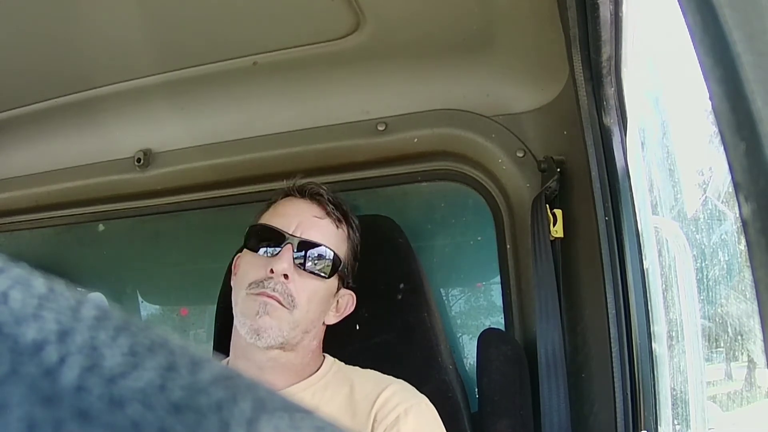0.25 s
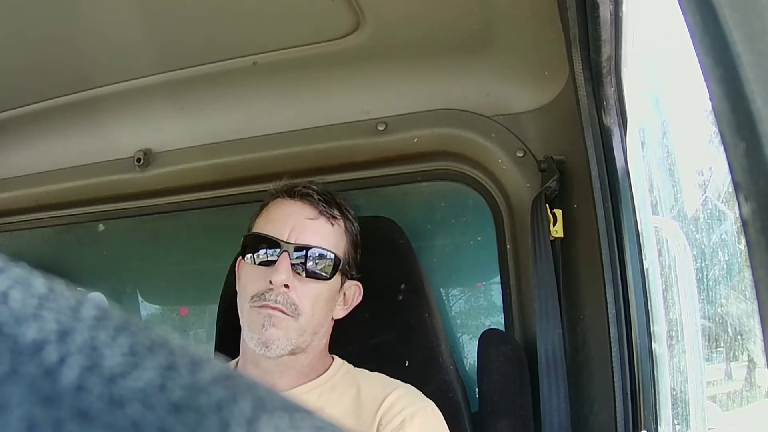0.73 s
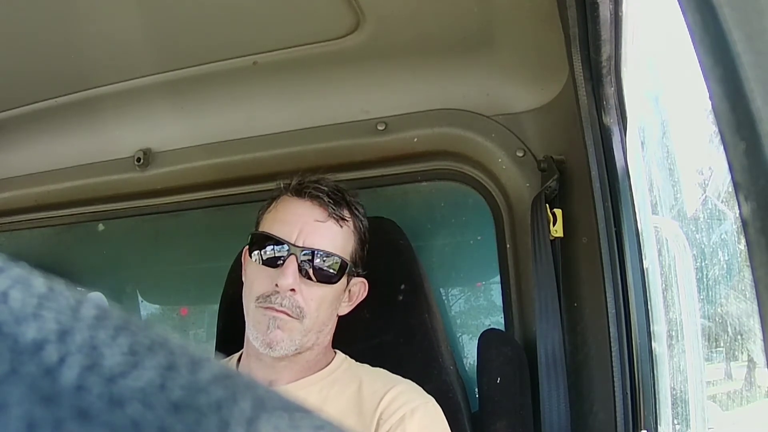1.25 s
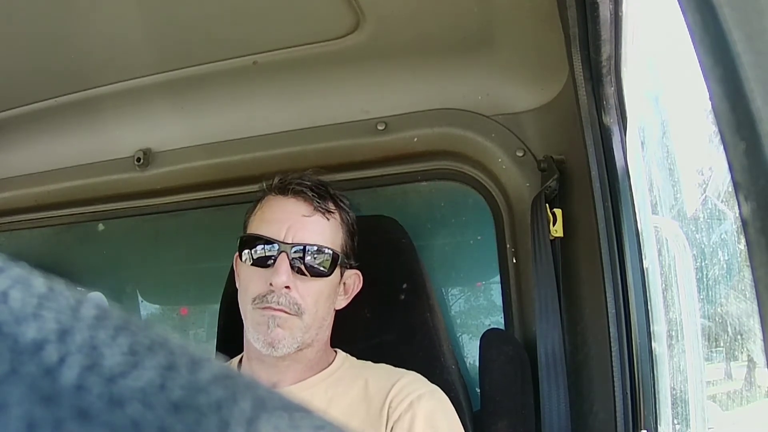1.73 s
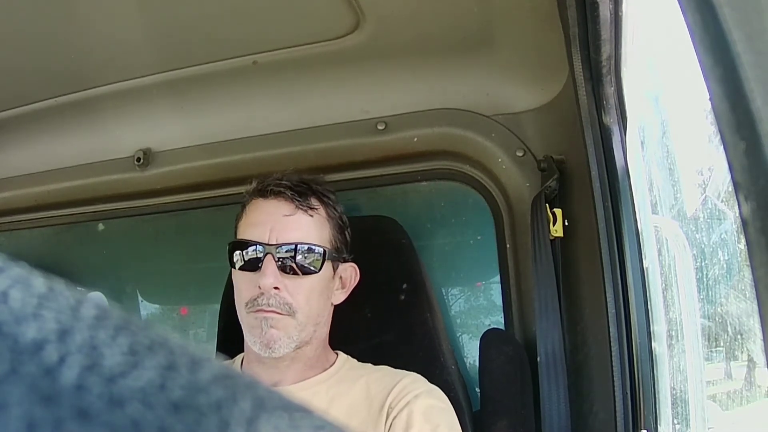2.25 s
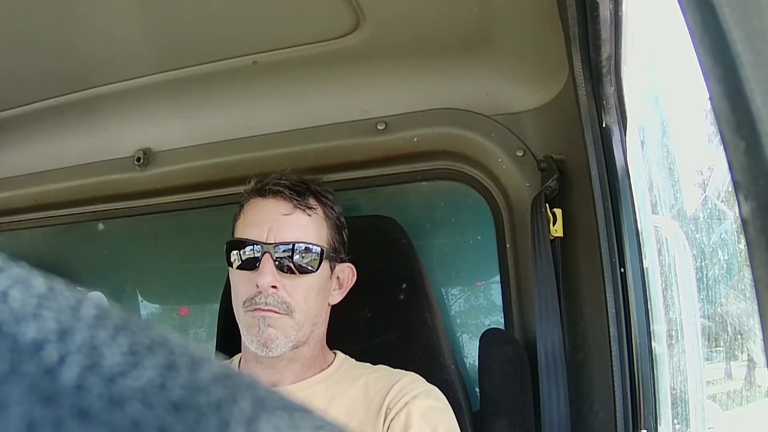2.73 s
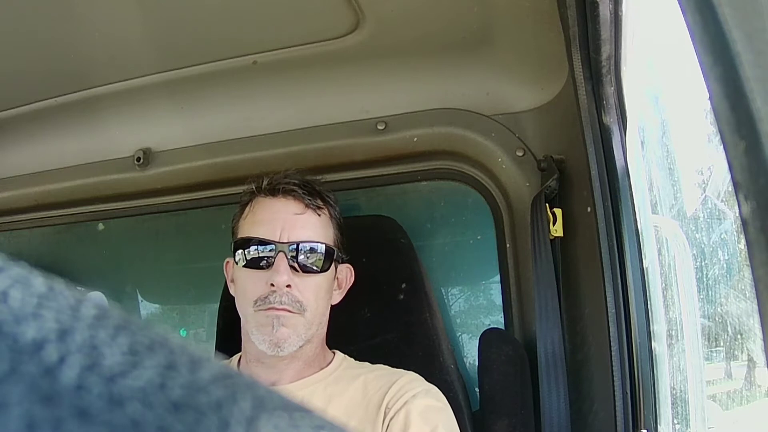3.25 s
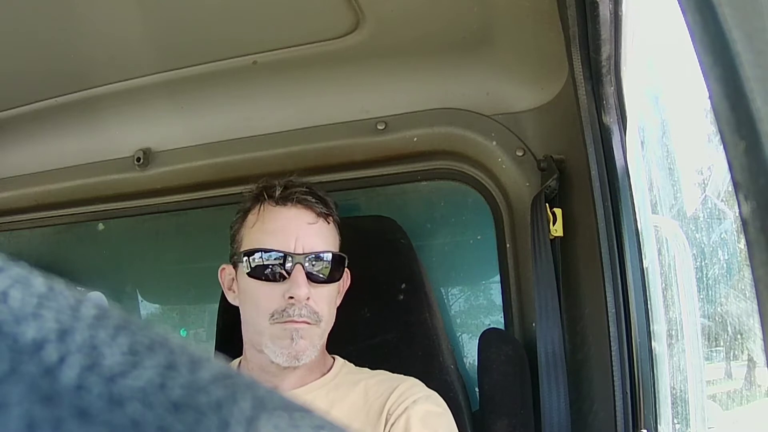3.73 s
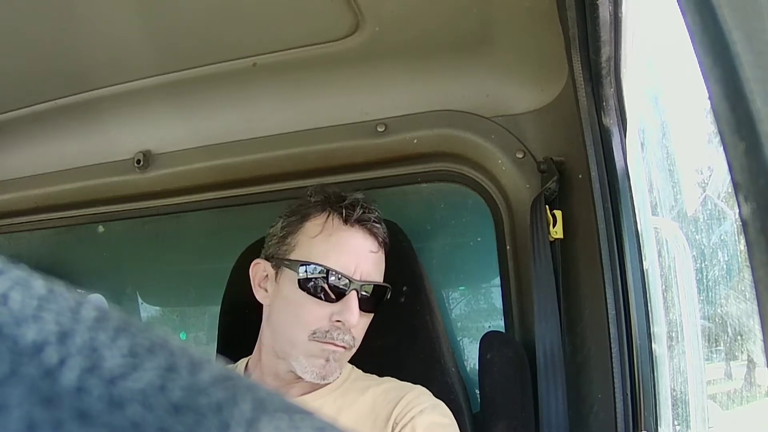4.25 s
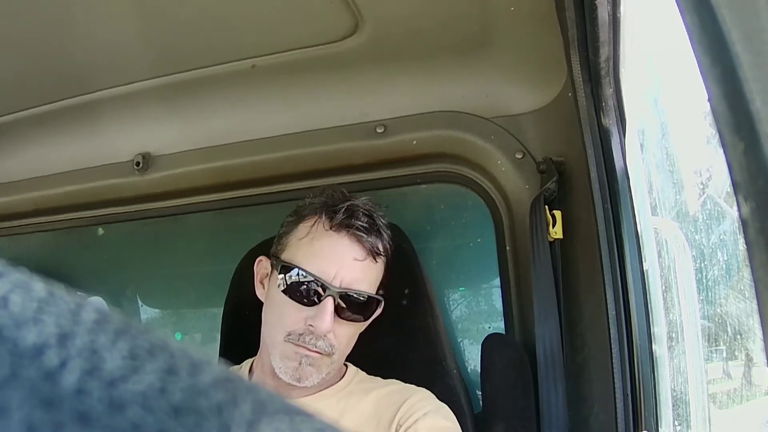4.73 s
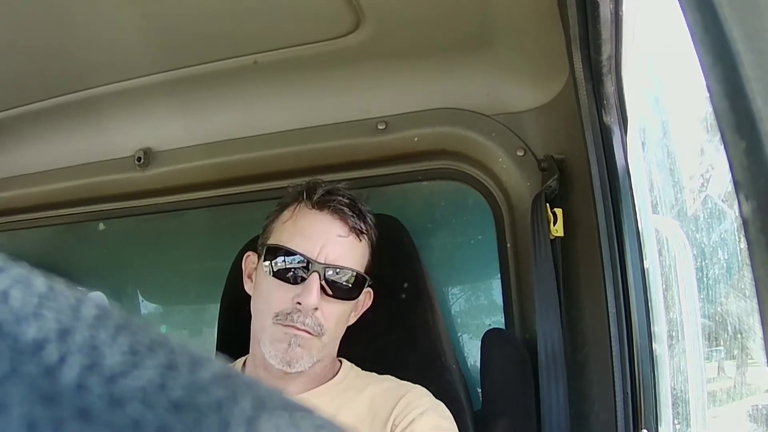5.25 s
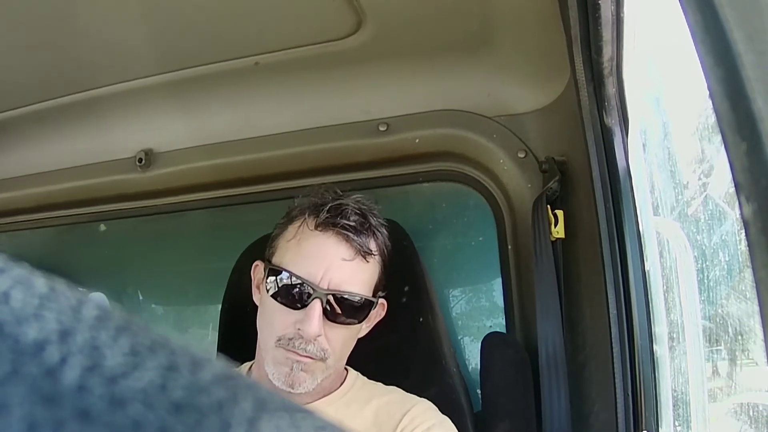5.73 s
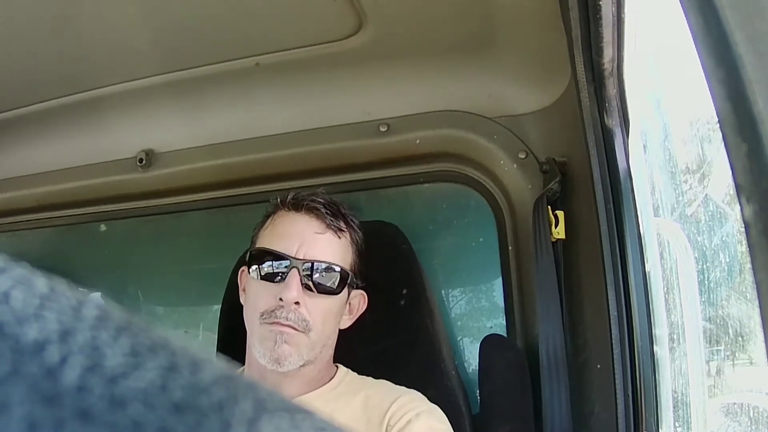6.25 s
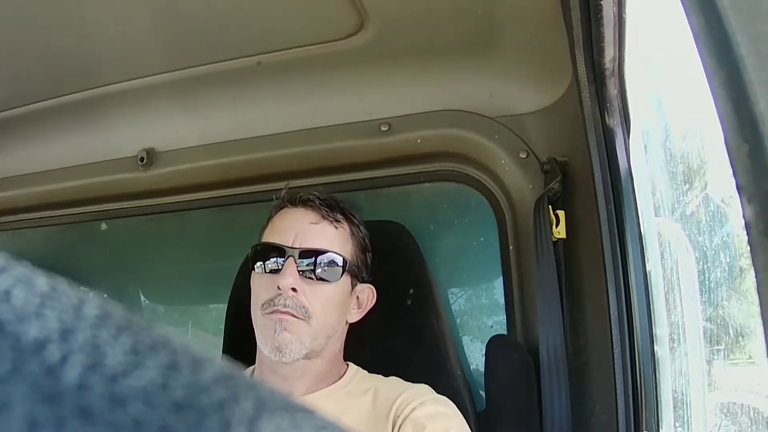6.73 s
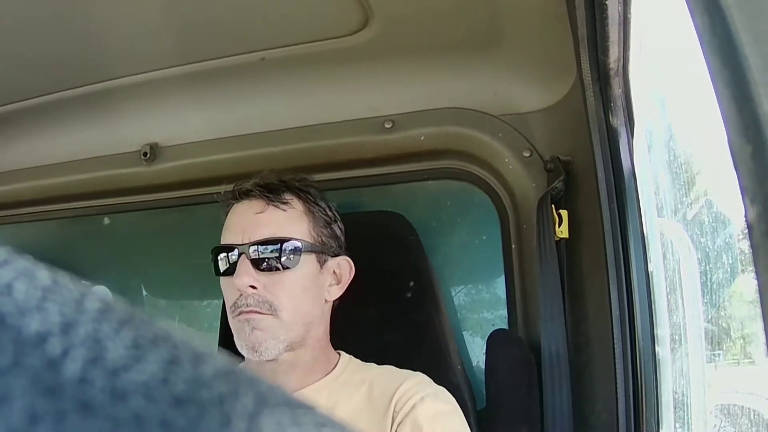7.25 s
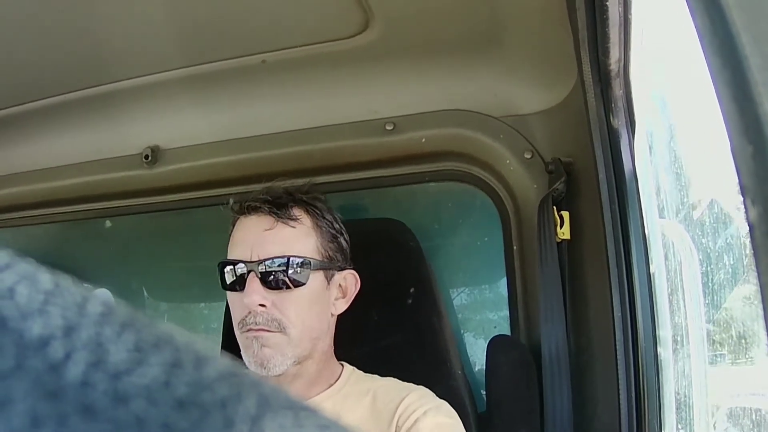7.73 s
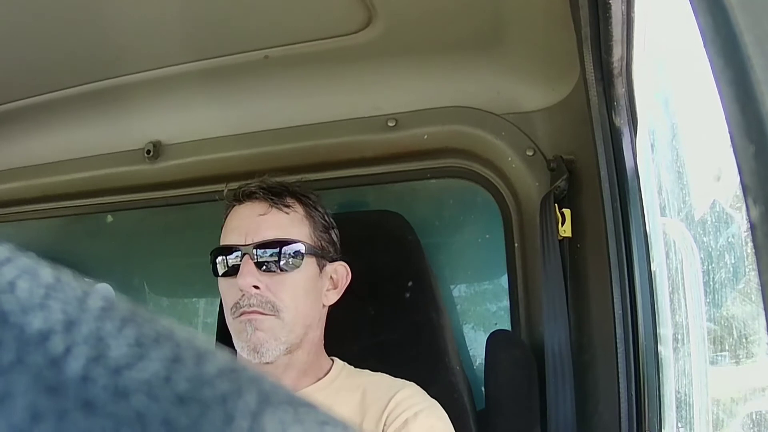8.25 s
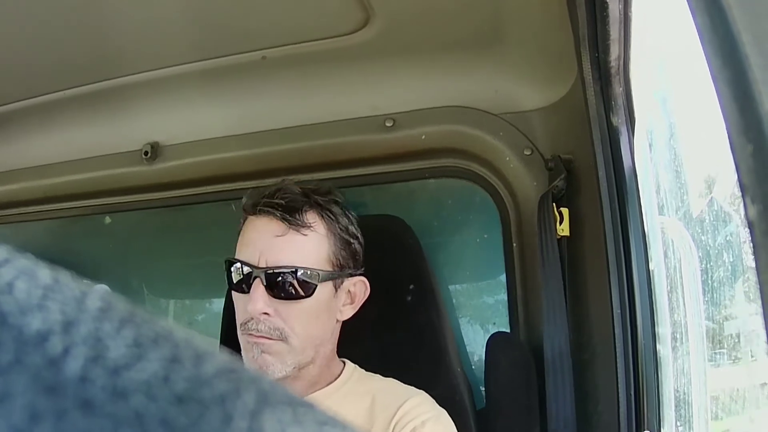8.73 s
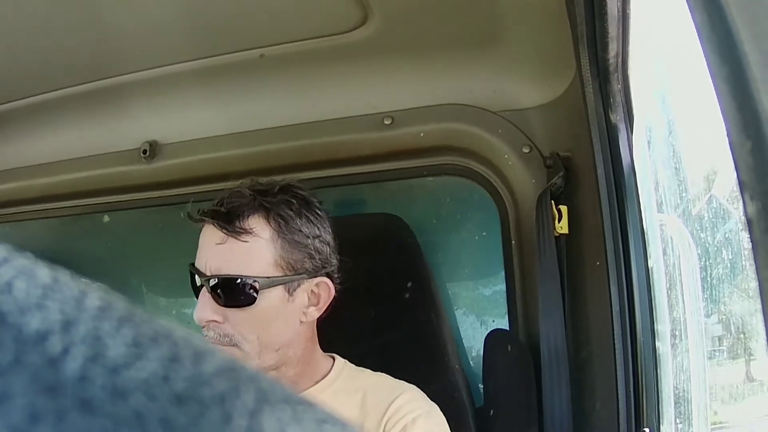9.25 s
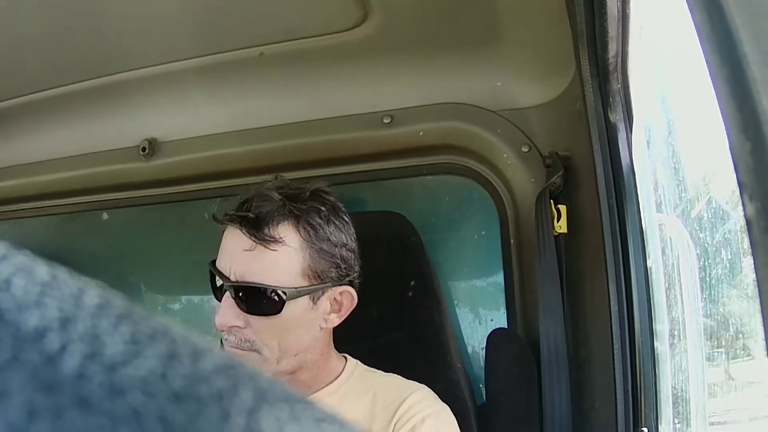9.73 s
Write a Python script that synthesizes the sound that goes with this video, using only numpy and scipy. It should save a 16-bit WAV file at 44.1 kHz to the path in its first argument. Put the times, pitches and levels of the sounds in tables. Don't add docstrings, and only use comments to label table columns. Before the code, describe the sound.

Inside a closed truck cab, one microphone hears a six-cylinder diesel idling steadily from 0 to 3.8 seconds: low, slightly uneven throb, soft clatter and faint gear hum. Around 3.9 a dull jolt marks the clutch biting; revs sag to a slow, heavy lugging by 5, with cab shudder, a cluster of padded linkage knocks, high trim ticks and tiny air puffs. From 5.4 revs climb, growing loud and boomy with buzzing panels, peaking near 6.9 amid low thuds, a thin gear whine, a slight belt squeak and very faint turbo whistle. Revs fall with a small dull spit at 7.1, rise again around 8, then drop. At 8.5 the gear lever hits its stop with a hard, rattling clunk; at 8.9 a short bright air blast vents. The engine pulls harder again, and a second clunk lands at 9.86 before a last low jolt.

```python
import sys
import numpy as np
from scipy import signal
from scipy.fft import rfft, irfft
from scipy.io import wavfile
from scipy.ndimage import uniform_filter1d

SR = 44100
rng = np.random.default_rng(int(sys.argv[2]) if len(sys.argv) > 2 else 0)


def pcm_store(signal):
    levels = np.round(np.clip(np.atleast_2d(signal), -1, 1) * 32767)
    wavfile.write(sys.argv[1], SR, levels.astype(np.int16).T)


def attenuation_scalar(level_db):
    decades = np.asarray(level_db, float) / 20
    return 10 ** decades


N = 440118

IDLE_ENDS_S, CLUTCH_BITES_S, CLUTCH_S = 3.82, 3.75, 0.21


def rms_one(x):
    return x / np.sqrt(np.mean(x ** 2) + 1e-20)


def evened(x):
    return x / np.sqrt(uniform_filter1d(x ** 2, SR // 2) + 1e-20)


def in_time(rows):
    s, *columns = np.transpose(rows)
    return [np.interp(np.arange(N) / SR, s, c) for c in columns]


def lowpass(x, order, hz):
    return signal.sosfilt(signal.butter(order, hz, fs=SR, output="sos"), x)


def band(x, low_hz, high_hz):
    return signal.sosfilt(signal.butter(3, [low_hz, high_hz], "band", fs=SR, output="sos"), x)


def drift(per_s):
    steps = rng.standard_normal(int(40 * N / SR) + 2)
    slow = signal.lfilter([1], [1, -np.exp(-2 * np.pi * per_s / 40)], steps)
    return np.interp(np.arange(N) / SR * 40, np.arange(len(slow)), rms_one(slow))


def bump(s, length):
    return np.cos(np.pi * np.clip((np.arange(N) / SR - s) / length, -.5, .5)) ** 2


def colour(x, slope, peaks):
    hz = np.maximum(np.fft.rfftfreq(16384, 1 / SR), 1)
    slope_hz, slope_db = np.transpose(slope)
    db = np.interp(np.log(hz), np.log(slope_hz), slope_db)
    db = db + sum(top_db / (1 + (2 * (hz - centre) / width) ** 2) for centre, width, top_db in peaks)
    cepstrum = irfft(np.log(attenuation_scalar(db)))
    cepstrum[1:8192] *= 2
    cepstrum[8193:] = 0
    return signal.fftconvolve(x, irfft(np.exp(rfft(cepstrum))))[:N]


def ring(clicks, hz, t60):
    r, w = attenuation_scalar(-60 / (t60 * SR)), 2 * np.pi * hz / SR
    return signal.lfilter([0, np.sin(w)], [1, -2 * r * np.cos(w), r * r], clicks + 1e-18)


def strike(times, levels_db, modes, spread_db):
    at, out = np.round(np.array(times) * SR).astype(int), np.zeros(N)
    levels_db = levels_db + spread_db * rng.standard_normal((len(at), len(modes)))
    for k, (hz, mode_db, t60) in enumerate(modes):
        clicks = np.zeros(N)
        clicks[at] = attenuation_scalar(levels_db[:, k] + mode_db) * (-1) ** k
        out += ring(clicks, hz, t60)
    return out


def dulled(hits, modes, offset_db):
    s, peak_db, dull_hz = np.transpose(hits)
    softness_db = -10 * np.log10(1 + (np.array(modes)[:, 0] / dull_hz[:, None]) ** 4)
    return strike(s, peak_db[:, None] + offset_db + softness_db, modes, spread_db=1.5)


def whistle(rows, width_hz, even=0):
    s, hz, level_db = np.transpose(rows)
    t = np.arange(int(s[0] * SR), min(int(s[-1] * SR), N)) / SR
    fade = np.clip(np.minimum(t - s[0], s[-1] - t) / 0.022, 0, 1)
    r = np.exp(-np.pi * width_hz / SR)
    flutter = signal.lfilter([1], [1, -2 * r, r * r], rng.standard_normal((2, len(t) + 3000)))[:, 3000:]
    phase = 2 * np.pi * np.cumsum(np.interp(t, s, hz)) / SR
    tone = flutter[0] * np.sin(phase) + flutter[1] * np.cos(phase)
    tone = rms_one(tone / np.hypot(*flutter) ** even)
    out, at = np.zeros(N), int(s[0] * SR)
    out[at:at + len(t)] = fade * attenuation_scalar(np.interp(t, s, level_db)) * tone
    return out


def glide(s, length, from_hz, to_hz, db, swell_db):
    u = np.linspace(0, 1, 9)
    return np.transpose([s + length * u, from_hz + (to_hz - from_hz) * u, db - swell_db * (2 * u - 1) ** 2])


def glides(rows, swell_db, width_hz, even=0):
    return sum(whistle(glide(*row, swell_db), width_hz, even) for row in rows)


def jets(rows, slope, peaks, short_t60, long_t60):
    rise_share, tail_open_s = .22, .012
    out, white = np.zeros(N), rng.standard_normal(N)
    t = np.arange(int(.4 * SR)) / SR
    for s, level_db, opening, slope_db in rows:
        rise = rise_share * opening
        t60 = long_t60 - (long_t60 - short_t60) * np.exp(-opening / tail_open_s)
        at = round(s * SR)
        jet = colour(white[at - 4000:at + len(t)], slope + [(16000, 2 * slope_db)], peaks)
        jet = rms_one(jet[4000:4000 + len(t)])[:N - at]
        shape = np.clip(t / max(rise, 1e-3), 0, 1) * attenuation_scalar(-60 * np.maximum(t - opening, 0) / t60)
        out[at:at + len(jet)] += attenuation_scalar(level_db) * jet * shape[:len(jet)]
    return out


# time in seconds, rate in firings per second.
CRANK_SPEED = [(0, 40.05), (3.75, 40.05), (3.95, 44), (4.5, 39.5), (4.9, 31.2), (5.22, 30.5), (5.45, 40.5),
               (5.7, 45), (6.12, 58), (6.5, 72), (6.9, 81.5), (7.55, 60.5), (7.95, 66.5), (8.12, 67),
               (8.3, 58), (8.65, 52), (9.2, 56), (9.98, 67)]


def crank_cycles():
    return np.cumsum(in_time(CRANK_SPEED)[0]) / 6 / SR


def contacts(cycles, angles, sizes, wobble_db):
    where = (np.arange(200)[:, None] + angles).ravel()
    strength = (sizes * attenuation_scalar(wobble_db * rng.standard_normal((200, len(angles))))).ravel()
    inside = where < cycles[-1]
    at = np.interp(where[inside], cycles, np.arange(N)).astype(int)
    return rms_one(np.bincount(at, strength[inside], N))


# centre in seconds, length in seconds, cab shake in dB, boom lift in dB.
LURCH_EVENTS = [(.44, 0.87, -62, 2.5), (1.45, 0.71, -60, 0.5), (3.94, 0.45, -42.5, 4), (4.45, 1, -42, 0),
                (5.024, 0.61, -28.5, 1.5), (5.477, 0.59, -37, 2), (6.08, 0.18, -35, 2.5),
                (6.48, 0.17, -60, 1), (6.582, 0.18, -46, 5), (6.882, 0.37, -43, 5.5),
                (5.73, 0.22, -45.5, 4), (7.05, .2, -46.5, 2), (7.32, 0.35, -55, 4.5),
                (8.104, 0.36, -44.5, 1.5), (8.47, 0.63, -41, 4), (8.857, 1, -65, 3.5),
                (9.112, .45, -32.5, 2), (9.55, 1, -42, 0.5), (9.98, 0.22, -34, 2)]


def shake():
    t = np.arange(N) / SR
    idle = attenuation_scalar(-45.5) * np.clip((CLUTCH_BITES_S + CLUTCH_S - t) / CLUTCH_S, 0, 1)
    return idle + sum(attenuation_scalar(db) * bump(s, length) for s, length, db, _ in LURCH_EVENTS)


# time in seconds, level above idle in dB.
ENGINE_EFFORT = [(0, 0.3), (3.6, 0.8), (3.9, 1.5), (4.7, 2.5), (4.92, 6), (5.07, 13), (5.3, 7.5),
                 (5.45, 3.5), (5.95, 7), (6.3, 11), (6.8, 10.5), (7.4, 6), (7.95, 10.5), (8.3, 6),
                 (8.87, 6), (9.1, 9.5), (9.5, 10.5), (9.98, 7.5)]
# idle level in dB, dB per dB of effort, dB per dB of lurch lift.
REGISTER_LEVELS = [
    (-43, 0.96, 1.36),
    (-47.5, 1.1423, 0.15),
    (-44.5, 0.8177, 0.22),
    (-62, 1.1163, 0.34),
]


def registers():
    effort, = in_time(ENGINE_EFFORT)
    lift = sum(lift_db * bump(s, length) for s, length, _, lift_db in LURCH_EVENTS)
    return [idle_db + by_effort * effort + by_lurch * lift
            for idle_db, by_effort, by_lurch in REGISTER_LEVELS]


# multiple of the cycle rate, level in dB.
GEAR_TONES = [(12, -60), (18, -52), (24, -42.5), (30, -63), (46, -56), (72, -58), (88, -61), (90, -59),
              (93, -62), (102, -58), (104, -59), (108, -56), (110, -53), (114, -61), (124, -57)]


def idle_gears(cycles, idling):
    out = np.zeros(N)
    for multiple, level_db in GEAR_TONES:
        phase = 2 * np.pi * (np.round(multiple) * cycles + rng.random())
        out += np.sqrt(2) * idling * attenuation_scalar(level_db + drift(0.19)) * np.sin(phase)
    return out


# multiple of the cycle rate, level in dB.
BOOM_ORDERS = [(8, -41), (9, -31), (12, -25.5), (16, -25), (18, -26), (24, -30.5), (30, -31), (36, -30)]


def boom_orders(cycles):
    return sum(attenuation_scalar(db + 2 * drift(2.9)) * np.sin(2 * np.pi * (np.round(multiple) * cycles + rng.random()))
               for multiple, db in BOOM_ORDERS)


CYLINDER_LEVELS = [1, -5.5, 2, -17.5, -4.5, -5]
REGISTER_EDGES = [62, 220, 420, 1500, 9000]
# frequency in Hz, level in dB per Hz.
BODY_SLOPE = [(45, -32), (70, -14.5), (110, -13), (200, -16.5), (260, -16.5), (370, -23.5), (550, -23.5),
              (900, -21), (1100, -27), (1450, -38.5), (2200, -45.5), (3300, -55.5), (5600, -65.5),
              (9000, -73.5)]
# frequency in Hz, width in Hz, height in dB.
CAB_PANELS = [(106.3, 30, 4), (163, 18.7, 9), (250, 19, -3.5), (383, 50, -2.5), (315, 50, 8), (478, 92, 6),
              (607, 29, 9), (730, 45, 14), (520, 40, 4), (690, 30, 5), (1310, 37, 7), (3540, 620, -5),
              (4460, 1170, 7)]
# frequency in Hz, width in Hz, height in dB.
LOADED_PANELS = [(338, 57, 15), (481, 53, 8.5), (597, 17, 7.5), (716, 130, 7.5), (1017, 147, 5.5),
                 (1340, 80, 6)]


def engine():
    t = np.arange(N) / SR
    cycles = crank_cycles()
    firings = contacts(cycles, np.arange(6) / 6, attenuation_scalar(CYLINDER_LEVELS), wobble_db=1.5)
    valves = contacts(cycles, rng.random(150), rng.standard_normal(150), wobble_db=1.5)
    block = rng.standard_normal(8000) * attenuation_scalar(-60 * t[:8000] / 0.1)
    clatter = rms_one(signal.fftconvolve(.55 * firings + valves, block)[:N])

    firing_sine = np.sin(12 * np.pi * cycles)
    throb = 1 + np.minimum(.08 + 8.5 * shake(), .25) * firing_sine
    noise = rms_one(throb * rng.standard_normal(N))

    steady = .35 + (.32 - .35) * np.clip((t - CLUTCH_BITES_S) / CLUTCH_S, 0, 1)
    idling = np.clip((IDLE_ENDS_S - t) / .1, 0, 1)
    loaded = np.clip((t - 4.6) / .5, 0, 1)
    random_part = np.sqrt(1 - steady) * noise

    low = np.sqrt(steady) * (.35 * firings + .8 * clatter) + random_part + (1 - idling) * boom_orders(cycles)
    without_air_mode = CAB_PANELS[:1] + CAB_PANELS[2:]
    low = idling * colour(low, BODY_SLOPE, without_air_mode) + (1 - idling) * colour(low, BODY_SLOPE, CAB_PANELS)
    mid = np.sqrt(steady) * clatter + random_part
    mid_idle = rms_one(colour(mid, BODY_SLOPE, CAB_PANELS))
    mid_pulling = rms_one(colour(mid, BODY_SLOPE, LOADED_PANELS))
    mid = (1 - loaded) * mid_idle + loaded * mid_pulling
    high = colour(noise + .3 * clatter, BODY_SLOPE, CAB_PANELS)

    out = np.sqrt(2) * shake() * firing_sine
    for k, (part, level_db) in enumerate(zip([low, low, mid, high], registers())):
        if k == 0:
            level_db = level_db - 2.5 * idling
        gain = attenuation_scalar(level_db + 0.59 + 0.15 * drift(13.0))
        out += gain * evened(band(part, *REGISTER_EDGES[k:k + 2]))
    return out + idle_gears(cycles, idling)


# start in seconds, length in seconds, from Hz, to Hz, level in dB.
ORDER_BOOMS = [(5.9, 0.201, 165, 172, -31), (6.2, 0.13, 168, 170, -30), (6.81, 0.19, 160, 162, -20),
               (3.75, .25, 160, 165, -42), (4.2, .3, 165, 160, -42), (3.92, .1, 215, 230, -40),
               (7.5, 0.26, 162, 163, -35), (8.85, 0.414, 164, 165, -37), (6.55, .2, 117, 141, -29),
               (6.98, .12, 119.4, 110, -29), (7.0, 0.32, 334, 315, -40), (6.64, .19, 128, 158, -26),
               (5.24, .11, 105, 108, -28), (5.02, .1, 110, 95, -30), (6.37, .13, 470, 485, -31.5),
               (6.39, 0.228, 325, 322, -31.5), (7.72, 0.403, 312, 325, -39.5), (7.62, 0.31, 480, 485, -43),
               (8.08, .2, 485, 490, -41.5), (9.22, 0.248, 470, 490, -40), (9.55, .25, 485, 490, -41.5),
               (11, .07, 720, 715, -39)]


def cab_booms():
    return glides(ORDER_BOOMS, swell_db=8, width_hz=5, even=.75)


# time in seconds, peak level in dB, frequency in
# Hz.
LOW_THUDS = [(3.946, -23, 142), (4.932, -17.5, 138), (5.253, -15, 105), (5.307, -15.5, 104.5),
             (6.691, -20, 136), (6.719, -14, 145), (6.751, -14, 123), (6.82, -13.5, 168),
             (6.872, -26, 166), (8.468, -14, 176), (8.473, -17, 190), (8.497, -14, 167), (8.509, -18, 167),
             (8.533, -20, 167), (8.528, -20, 280), (8.5423, -20, 280), (8.5637, -22, 280),
             (9.935, -18.5, 172)]


def low_thuds():
    out = sum(strike([s], peak_db - 1.5, [(hz, 0, 0.076)], spread_db=0) for s, peak_db, hz in LOW_THUDS)
    return lowpass(out, 2, 260)


# time in seconds, peak level in dB, dullness in Hz.
FRONT_BLOWS = [
    (8.517, -21, 1200),
    (8.5255, -4, 4000),
    (8.5325, -7, 600),
    (8.538, -12, 500),
    (8.542, -20, 1500),
    (8.549, -17, 600),
    (8.556, -20, 400),
    (8.564, -15, 400),
]
# frequency in Hz, level in dB, t60 in seconds.
FRONT_MODES = [(400, -10, .03), (480, -9, .035), (620, 1.5, .04), (867, 0, .025), (1060, -4, .04),
               (1300, -22, .02), (1577, -27, .03), (1814, -30, 0.022), (2309, -32, .02), (2546, -23, 0.016),
               (2870, -28, .02)]
# time in seconds, peak level in dB, dullness in Hz.
REAR_BLOWS = [
    (9.8445, -15, 900),
    (9.851, -22, 1000),
    (9.8638, -6.5, 4000),
    (9.8705, -15, 1300),
    (9.8755, -17, 900),
    (9.880, -14, 800),
    (9.89, -25, 1200),
    (9.899, -26, 900),
]
# frequency in Hz, level in dB, t60 in seconds.
REAR_MODES = [(205, -6, 0.15), (330, -22, .05), (452, -6, 0.055), (640, -1, .025), (571, -11, .06),
              (705, -2, .06), (830, -6, .045), (1034, -17, .04), (1250, -15, .03), (1450, -24, .03),
              (1717, -22, .035), (2046, -31, .02)]


def lever_stops():
    return sum(lowpass(dulled(hits, modes, offset_db=-5.0), 3, 2500)
               for hits, modes in [(FRONT_BLOWS, FRONT_MODES), (REAR_BLOWS, REAR_MODES)])


# time in seconds, peak level in dB, dullness in Hz.
LINKAGE_KNOCKS = [(4.952, -16.5, 1300), (5.014, -22.5, 1100), (5.049, -24, 1200), (5.079, -23, 1300),
                  (5.113, -25, 1200), (5.234, -25, 1200), (5.169, -29, 1200), (5.328, -24, 900),
                  (5.275, -27, 900), (6.748, -30, 900), (4.98, -29, 1200), (5.14, -27, 1100),
                  (5.178, -26, 1100)]
# frequency in Hz, level in dB, t60 in seconds.
LINKAGE_MODES = [(274, -2, 0.03), (446, -7, 0.12), (558, -0.5, 0.061), (684, 1, 0.048), (838, 0, 0.053),
                 (1046, -1, 0.035), (1300, -18, .02), (1576, -10.5, 0.028), (1870, -20, 0.018),
                 (2180, -39, 0.017), (2450, -13, 0.018), (2950, -12, 0.03), (205, -3, 0.11)]


def linkage():
    return lowpass(dulled(LINKAGE_KNOCKS, LINKAGE_MODES, offset_db=-9), 2, 2800)


# start in seconds, rms level in dB, opening in seconds, brightness as half the
# spectrum level at 16 kHz in dB.
GATE_SCUFFS = [
    (8.458, -39, .012, -35),
    (8.49, -37, .028, -35),
    (8.531, -33, .014, -35),
    (8.568, -38, .006, -35),
    (9.866, -37, .016, -35),
]
# frequency in Hz, level in dB per Hz.
GATE_SPECTRUM = [(300, -25), (550, -2), (900, 0), (1500, -11), (2300, -24), (5000, -52)]


def gate_scuffs():
    return jets(GATE_SCUFFS, GATE_SPECTRUM, [], short_t60=.03, long_t60=.06)


# start in seconds, rms level in dB, opening in seconds, brightness as half the spectrum
# level at 16 kHz in dB.
VALVE_BLASTS = [
    (7.082, -46.5, 0.0028, -18),
    (8.885, -35.5, 0.019, 1),
]
# frequency in Hz, level in dB per Hz.
NOZZLE_SPECTRUM = [(900, -36), (1700, 11), (3200, 4.0), (5000, 12.5)]
# frequency in Hz, width in Hz, height in dB.
NOZZLE_PEAKS = [(2000, 170, 11), (4300, 550, 9), (5120, 350, 11), (6310, 200, 9), (7800, 2000, -3),
                (9900, 800, 5), (11600, 900, 4), (13500, 900, 3)]
# frequency in Hz, level in dB, t60 in seconds.
VALVE_MODES = [(1433, -2, .04), (1700, -5, .03), (2030, 0, .035), (2260, -6, .03), (2480, -7, .035),
               (2750, -12, .03)]


def shift_valve():
    snap = strike([7.0815], -38, VALVE_MODES, spread_db=0)
    return snap + jets(VALVE_BLASTS, NOZZLE_SPECTRUM, NOZZLE_PEAKS, short_t60=0.038, long_t60=0.12)


# start in seconds, rms level in dB, opening in seconds, brightness as half the spectrum level at 16 kHz in
# dB.
AIR_PUFFS = [(3.94, -69, 0.054, -3), (4.952, -58, .003, 1), (5.08, -58, .005, -10),
             (5.137, -52, 0.0025, -14), (5.172, -62, .004, 0), (5.298, -57, .004, -5),
             (5.433, -57, .045, -7), (5.6, -60, 0.035, -15), (6.174, -52, .028, -8),
             (6.668, -58, 0.043, -5), (7.084, -56, 0.014, -26), (8.905, -48, 0.028, -30),
             (7.297, -53.5, 0.017, -14), (8.037, -52, 0.045, -3.5), (8.202, -61, .06, -9),
             (8.475, -55, 0.045, -9), (8.526, -46, 0.0055, 0), (9.68, -58, 0.01, 2),
             (9.87, -59, 0.022, -14), (9.825, -63, 0.03, -4)]
# frequency in Hz, level in dB per Hz.
LEAK_SPECTRUM = [(900, -36), (1700, 17), (3200, 5.0), (5000, 12.5)]
# frequency in Hz, width in Hz, height in dB.
LEAK_PEAKS = [(2300, 3700, 16), (4420, 1600, 6.5), (7000, 900, -1.5)]


def air_puffs():
    return jets(AIR_PUFFS, LEAK_SPECTRUM, LEAK_PEAKS, short_t60=.015, long_t60=0.12)


# start in seconds, length in seconds, from Hz, to Hz, level in dB.
PANEL_BUZZES = [(3.881, 0.18, 318.4, 320, -38.5), (3.95, 0.09, 1065, 1055, -47),
                (3.78, 0.14, 2280, 2330, -69), (4.12, 0.27, 205, 217.5, -40.5), (6.24, .12, 330, 310, -37),
                (6.5, .15, 490, 460, -34), (8.85, .35, 1030, 1080, -42), (9.2, .3, 1130, 1200, -48),
                (6.77, .14, 479.7, 491, -37), (8.585, 0.0466, 1480, 1470, -47),
                (5.757, .2, 930, 1030, -43.5), (6.22, 0.14, 1330, 1300, -50), (6.36, .2, 1310, 1290, -47),
                (6.3, .3, 920, 960, -41.5), (6.6, .14, 920, 950, -41), (6.55, .12, 520, 580, -40),
                (7.001, 0.4, 685, 700, -40.5)]


def panel_buzzes():
    return glides(PANEL_BUZZES, swell_db=16.5, width_hz=45, even=.3)


# time in seconds, peak level in dB.
TRIM_TICKS = [(4.7626, -59), (4.932, -53), (5.024, -54), (5.0669, -62), (5.083, -46), (5.1367, -66),
              (5.1806, -51), (5.2135, -57), (5.5129, -56), (5.5842, -57), (6.172, -47), (6.3495, -56),
              (6.4797, -51), (6.6199, -52), (6.6603, -49), (6.7555, -57), (6.882, -56), (6.926, -55),
              (7.7692, -60), (8.0466, -53), (8.2262, -56), (8.4422, -48), (8.6326, -43), (4.954, -58),
              (8.7944, -56), (7.303, -60), (9.683, -59), (9.964, -64)]
# frequency in Hz, level in dB, t60 in seconds.
TRIM_MODES = [(4700, -8, 0.005), (5800, -6, .005), (6400, -0.5, 0.006), (7200, -2, .005), (8300, -2, .005),
              (9300, -5, .004), (10500, -8, 0.003)]


def trim_ticks():
    ticks = np.array(TRIM_TICKS)
    return strike(ticks[:, 0], ticks[:, 1:] - 5.0, TRIM_MODES, spread_db=2.0)


# time in seconds, blade tone in Hz, level in dB.
BLADE_TONE = [(4.6, 5900, -100), (5.3, 7000, -94), (5.8, 8700, -89), (6.05, 9650, -87), (6.2, 10700, -89),
              (6.4, 12300, -87), (6.6, 14000, -85), (6.75, 14900, -86), (6.86, 15300, -88),
              (7.0, 14500, -87), (7.15, 13500, -88), (7.4, 12300, -88), (7.62, 11800, -87),
              (7.8, 12400, -89), (8.08, 14100, -87), (8.25, 13200, -91), (8.4, 12000, -93),
              (8.8, 11000, -100), (9.1, 12500, -91), (9.47, 14200, -86), (9.66, 15100, -89),
              (9.8, 14300, -88), (9.98, 13000, -90)]
# start in seconds, length in seconds, level in dB.
TURBINE_PASSAGES = [
    (6.55, .45, -83),
    (7.0, .9, -88),
    (8.1, .4, -86),
    (9.35, .63, -88),
]


def turbo():
    s, hz, _ = np.transpose(BLADE_TONE)
    out = whistle(BLADE_TONE, width_hz=550)
    for start, length, db in TURBINE_PASSAGES:
        at, _, level_db = glide(start, length, 0, 0, db, swell_db=5).T
        out += whistle(np.c_[at, .64 * np.interp(at, s, hz), level_db], width_hz=250)
    return attenuation_scalar(2.2 * drift(8) + 1) * out


# start in seconds, length in seconds, from Hz, to Hz, level in dB.
GEAR_WHINES = [(5.8, .3, 1930, 2240, -67), (6.56, .17, 2820, 3000, -66), (6.65, .09, 2930, 2960, -60),
               (6.6, .2, 3130, 3190, -62), (6.66, .07, 4720, 4620, -64), (6.74, .16, 4620, 4760, -68),
               (6.74, .12, 3950, 4020, -68), (9.2, .3, 3420, 3530, -73), (6.75, .09, 1800, 1810, -60)]


def gear_whines():
    return glides(GEAR_WHINES, swell_db=12, width_hz=120)


# start in seconds, length in seconds, from Hz, to Hz, level in dB.
BELT_SQUEAKS = [
    (6.812, .11, 3150, 3150, -61),
    (6.66, .12, 3160, 3260, -66),
]


def belt_squeaks():
    return glides(BELT_SQUEAKS, swell_db=5, width_hz=8, even=.9)


# start in seconds, length in seconds, from Hz, to Hz, level in dB.
LINE_SEEPS = [
    (4.74, .2, 4100, 4250, -72),
    (4.96, .36, 4300, 4280, -69),
    (4.996, .6, 6900, 7000, -85),
    (6.1, .9, 7200, 7000, -82),
    (6.2, 0.38, 4230, 4250, -73),
]


def air_seeps():
    return glides(LINE_SEEPS, swell_db=3, width_hz=350)


def rumble():
    standing = np.clip((IDLE_ENDS_S - np.arange(N) / SR) / CLUTCH_S, 0, 1)
    level_db = -61.5 - 7 * standing + 0.56 * (registers()[0] + 60)
    return attenuation_scalar(level_db) * rms_one(band(rng.standard_normal(N), 6.4, 50.0))


def microphone_hiss():
    slope = [(1000, 4.5), (6000, -2.5), (11000, 0.069), (16000, -3.0)]   # Hz, dB per Hz
    return attenuation_scalar(-73.5) * rms_one(colour(rng.standard_normal(N), slope, []))


def scene():
    mix = engine() + cab_booms() + low_thuds()
    mix += lever_stops() + linkage() + gate_scuffs()
    mix += shift_valve() + air_puffs() + air_seeps()
    mix += panel_buzzes() + trim_ticks()
    mix += turbo() + gear_whines() + belt_squeaks()
    mix += rumble()
    return mix[None]


def band_limit(x):
    return signal.sosfilt(signal.butter(12, 15670, fs=SR, output="sos"), x)


def record(dry):
    rounded = .7 * np.tanh((dry + microphone_hiss()) / .7)
    top_cut = signal.ellip(10, .5, 60, 15600, fs=SR, output="sos")
    mix = signal.sosfilt(top_cut, rounded)
    return band_limit(mix)


dry = scene()
out = record(dry)
pcm_store(out)
```